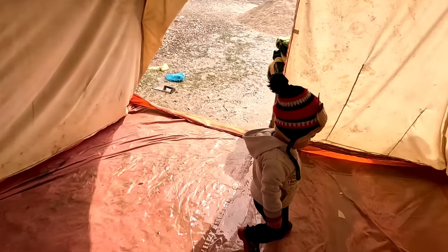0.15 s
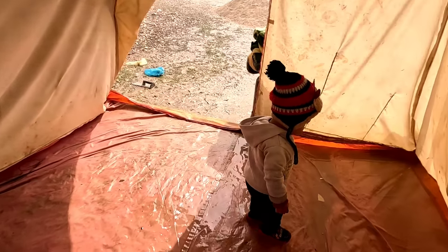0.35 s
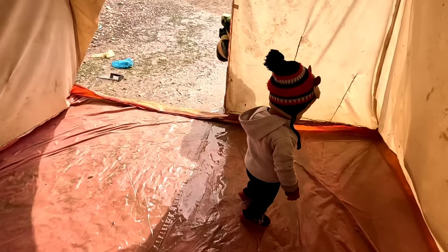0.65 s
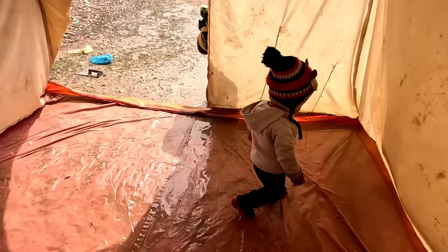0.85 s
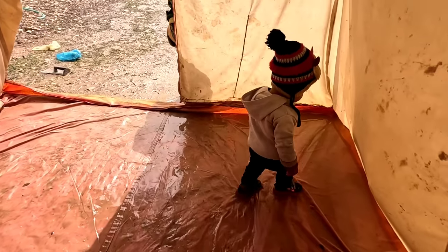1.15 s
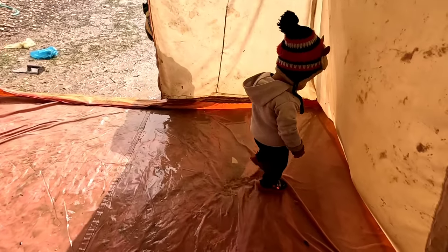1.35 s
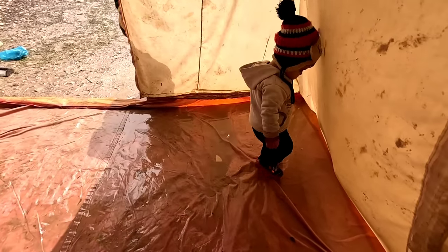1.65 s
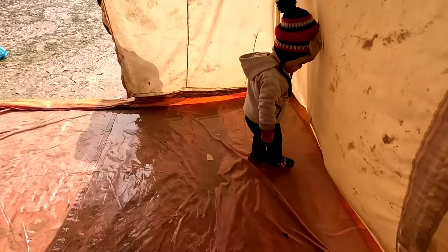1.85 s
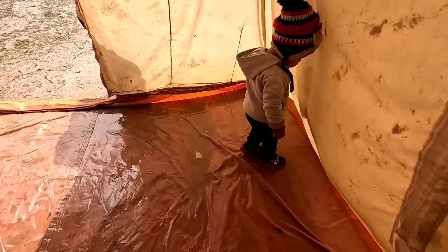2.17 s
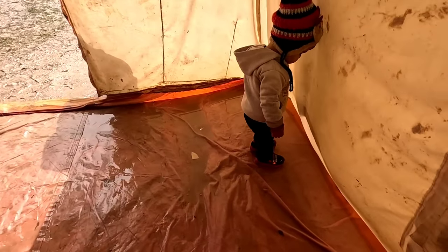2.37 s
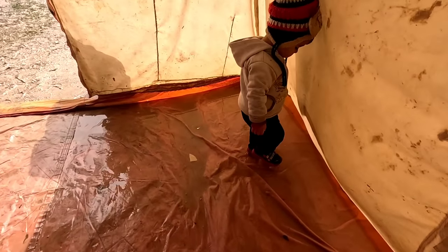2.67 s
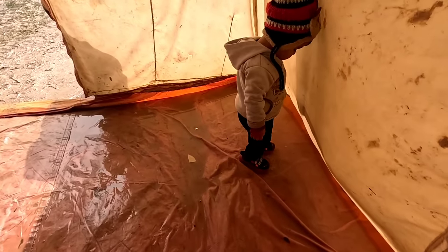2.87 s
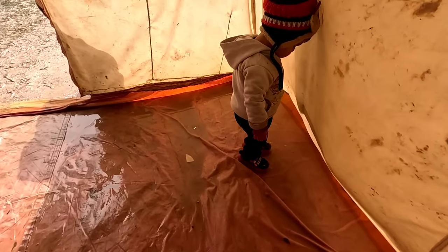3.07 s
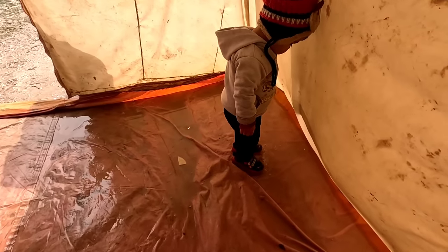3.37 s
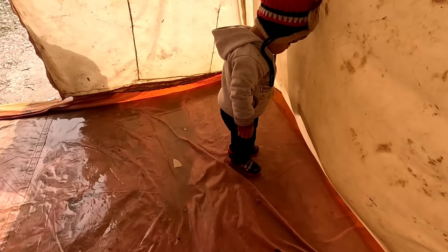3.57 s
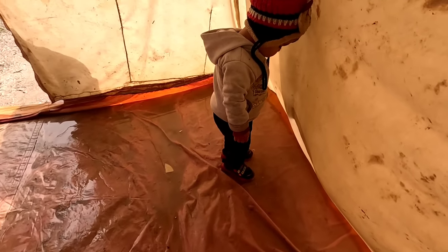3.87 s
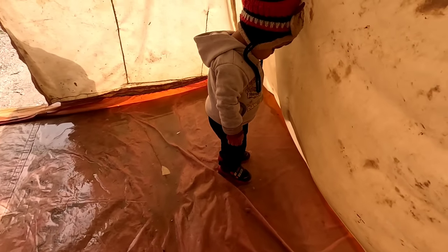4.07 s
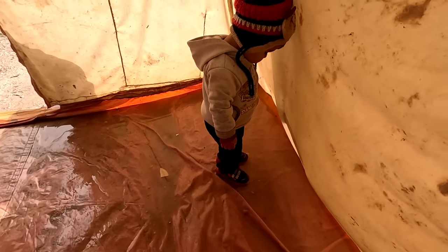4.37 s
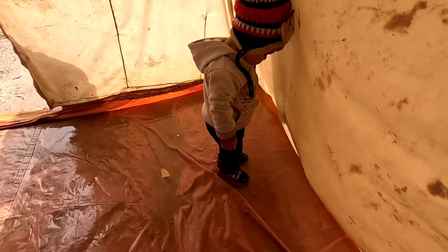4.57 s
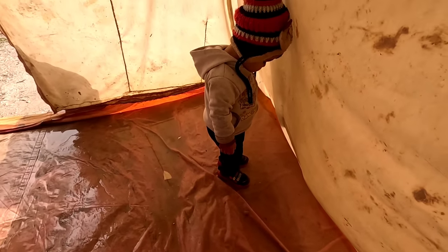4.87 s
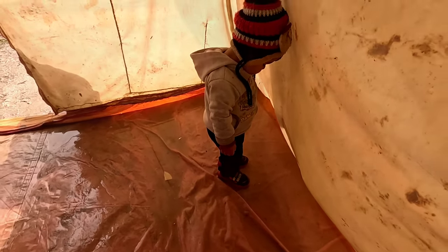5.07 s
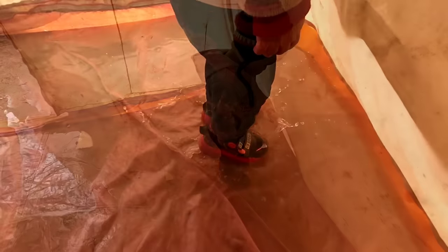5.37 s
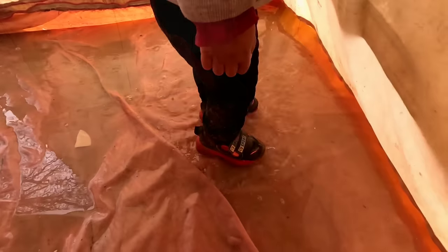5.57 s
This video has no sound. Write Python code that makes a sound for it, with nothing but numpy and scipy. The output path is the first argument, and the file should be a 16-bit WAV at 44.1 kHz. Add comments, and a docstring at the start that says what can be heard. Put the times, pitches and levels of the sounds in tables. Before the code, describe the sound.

Small wet footsteps patter through a puddle inside a canvas tent, pause over a faint trickle, and resume closer after thumps on the microphone.

```python
"""Boots slap shallow water first: a toddler paddles on the plastic groundsheet of a flooded tent.
Each slap is a cloud of damped bubble tones and noise; larger air pockets plop as gliding damped sines.
Between the steps a wash of bubble noise trickles back; dull bumps ring a small casing and rub noise on it.
Far off an engine hums as a sinking sine, a bird chirps in swept sines, and filtered noise gives murk and
puffs of air. The canvas adds a diffuse tail; near the end the sound turns louder, wide and left-bright."""
import sys
import numpy as np
from scipy import signal
from scipy.fft import rfft, irfft, next_fast_len
from scipy.io import wavfile
from scipy.ndimage import uniform_filter1d, map_coordinates

SR = 44100
rng = np.random.default_rng(int(sys.argv[2]) if len(sys.argv) > 2 else 0)


def int16_out(signal):
    """Quantize to a 16-bit WAV file."""
    q = np.round(np.clip(np.atleast_2d(signal).T, -1, 1) * 32767)
    wavfile.write(sys.argv[1], SR, q.astype(np.int16))


N = 252252
T = np.arange(N) / SR  # time [s]

# Boots slapping the water:
# (time [s], rise [s], t60 [s], level [dB], commonest bubble pitch [Hz], pitch spread [octaves])
SPLASHES = [(.075, 0.012, .22, -38.5, 1670, 0.74), (.165, 0.027, 0.23, -47, 2160, 0.45),
            (.272, 0.031, 0.13, -41.5, 2290, 0.37), (.357, 0.0038, 0.11, -38, 2480, 0.26),
            (.367, .014, .13, -29.5, 3020, 0.3), (.448, 0.011, 0.2, -30.5, 2660, 0.4),
            (.895, 0.02, 0.27, -44.5, 2180, 1.2), (.914, 0.0093, .15, -33.5, 2540, 1.3),
            (1.176, 0.0023, .1, -39.5, 3380, 0.55), (1.179, 0.011, 0.17, -35.5, 3000, 0.63),
            (1.533, 0.0086, 0.21, -40.5, 1810, 0.82), (1.549, 0.01, 0.1, -34, 1160, 0.89),
            (1.579, 0.0061, 0.12, -29.5, 3400, 0.69), (1.659, 0.045, .15, -40, 2080, 0.95),
            (1.956, 0.0087, 0.6, -49, 2640, 1.04), (1.989, 0.0013, .2, -36, 3320, 0.12),
            (2.007, 0.0051, 0.093, -33, 4900, 0.83), (2.496, 0.024, 0.14, -37.5, 3800, 1.8),
            (2.541, 0.0047, 0.14, -35, 1200, 0.65), (2.623, 0.0039, 0.09, -42.5, 1980, 0.35),
            (2.761, 0.037, 0.068, -46.5, 1340, 0.5), (2.886, 0.014, 0.089, -48.5, 3000, 0.47),
            (2.905, 0.011, 0.15, -31, 2520, 0.72), (2.986, 0.0039, 0.17, -45.5, 2830, 0.41),
            (3.287, 0.0056, 0.11, -33.5, 3800, 0.43), (3.304, 0.018, .135, -31, 2050, 0.83),
            (5.309, .0012, 0.073, -36.5, 1860, 0.53), (5.319, 0.012, 0.2, -38, 1820, 0.57),
            (5.416, 0.0015, 0.12, -40.5, 1670, 0.48), (5.463, 0.0016, 0.068, -37.5, 2020, 0.47),
            (5.477, 0.011, 0.24, -43.5, 2330, 0.41)]
# Fine spray: commonest pitch [Hz], spread [octaves]
SPRAY_HZ, SPRAY_SPREAD = 6960, 0.43
# Spray relative to a hard slap [dB], level of such a slap [dB], extra share of harder slaps [dB per dB]
SPRAY_DB, HARD_SLAP_DB, SPRAY_GROWS = -13.5, -30, 1.3


def splashes(crack=2.6, clump_db=1.2):
    """Minnaert resonance: entrained bubbles ring, small ones crackling and large ones longer, amid fine spray."""
    out = np.zeros(N)
    t = np.arange(SR // 3) / SR
    for s, rise, t60, db, pitch, spread in SPLASHES:
        # only a sudden slap opens with a crack
        envelope = swell(t, rise, t60, curve=0.61) + crack * np.exp(-(t + rise) / 0.0015)
        crackle = bubbles(len(t), per_second=4000, cycles=1.3, spread_db=3.5, size=192)
        ringing = bubbles(len(t), per_second=1500, cycles=25, spread_db=1, size=640)
        hiss = rng.standard_normal(len(t))
        clumps = amp(clump_db * wobble(197, size=len(t)))
        cloud = envelope * clumps * (crackle + 0.79 * ringing + 0.58 * hiss)
        spray = amp(SPRAY_DB + SPRAY_GROWS * (db - HARD_SLAP_DB))

        def colour(hz):
            """Incoherent sources add in power: bubble cloud plus spray."""
            return np.hypot(bubble_colour(hz, pitch, spread),
                            spray * bubble_colour(hz, SPRAY_HZ, SPRAY_SPREAD))

        cloud = filtered(cloud, colour)
        # the cloud takes the energy of its envelope
        add(out, s, amp(db) * cloud * np.linalg.norm(envelope) / np.linalg.norm(cloud))
    return out


# Colour common to all splashes: (frequency [Hz], gain [dB])
WATER = [(60, -9), (300, 5), (600, 1.5), (3000, -0.5), (10300, -1), (12000, -14), (15000, -16)]
SKIRT_DB_PER_OCTAVE = 6  # for a spread of one octave, far from the commonest pitch


def bubble_colour(hz, pitch, spread):
    """Size distribution: bubbles thin out to either side of the commonest pitch; the gain has rms 1."""
    octaves = np.log2((hz + 1) / pitch)
    skirt = SKIRT_DB_PER_OCTAVE * np.hypot(1, octaves / spread)
    return unit(amp(along(WATER, hz) - skirt))


# Larger air pockets closing, and single drops landing: (time [s], pitch [Hz], relative level [dB])
PLOPS = [(.081, 1090, -28), (0.086, 1526, -34), (.172, 2120, -43), (.923, 706, -34), (0.941, 3090, -33.5),
         (2.006, 2610, -25.5), (2.545, 420, -42), (2.545, 1085, -29.5), (2.549, 1385, -31.5),
         (2.607, 780, -38.5), (2.61, 1940, -43), (2.626, 2094, -32.5), (2.848, 2540, -45),
         (2.99, 2710, -41), (3.002, 4170, -40), (3.314, 2412, -25), (3.322, 1680, -28.5),
         (3.436, 2130, -45.5), (3.87, 8500, -60.5), (4.145, 9100, -66), (4.197, 4300, -57.5),
         (4.312, 11500, -71), (4.448, 10130, -62.5), (4.688, 6300, -56.5), (5.339, 1950, -45),
         (5.417, 1776, -35.5), (5.463, 1563, -34), (5.495, 2030, -41), (5.502, 1610, -39.5),
         (5.533, 822, -44.5), (5.539, 1160, -48.5)]


def plops(t60=0.055, glide=0.19, attack=0.0012, rough=0.078):
    """Bubble resonance: a trapped pocket rings briefly, jostled by shallow water and rising as it surfaces."""
    out = np.zeros(N)
    t = np.arange(SR // 12) / SR
    for s, hz, db in PLOPS:
        jostle = unit(uniform_filter1d(rng.standard_normal(len(t)), size=40))
        pitch = hz * (1 + glide * (t - t60 / 4) + rough * jostle)  # glide is a fraction per second
        ring = np.sin(2 * np.pi * np.cumsum(pitch) / SR)
        onset = 1 - np.exp(-t / attack)
        add(out, s, amp(db + 2.5 - 60 * t / t60) * onset * ring)
    return out


# Spectrum of the low wash: (frequency [Hz], relative density [dB per Hz])
GURGLE = [(200, -2), (500, -14), (900, -7), (1500, -0.5), (2100, -7), (3500, -45), (8000, -70)]
# Spectrum of the bright wash: (frequency [Hz], relative density [dB per Hz])
FIZZ = [(900, -39), (2000, -2), (3200, 2.5), (5000, -7), (10000, -19), (11800, -27.5), (15000, -39)]
# Spectrum of the drips: (frequency [Hz], relative density [dB per Hz])
DRIPS = [(500, -20), (1500, -7), (3500, -11), (6000, -9), (10000, -18), (15000, -45)]
# Wavelets running back over the sheet after the steps:
# (time of crest [s], half-length [s], relative gurgle level [dB], relative fizz level [dB])
BACKWASH = [(0.042, 0.043, -62, -53.5), (0.644, 0.058, -74, -54), (0.742, 0.075, -57.5, -55.5),
            (1.082, 0.055, -85, -59.5), (1.31, 0.1, -58, -54.5), (1.853, 0.084, -58.5, -55.5),
            (2.276, 0.041, -58, -57.5), (2.46, 0.15, -64, -58), (2.71, 0.11, -54, -53),
            (3.12, 0.079, -54.5, -50.5), (3.443, 0.038, -59.5, -54), (3.946, 0.15, -64.5, -69),
            (4.64, 0.1, -66.5, -61), (4.843, 0.1, -80, -66), (5.676, 0.014, -56.5, -65)]
CALM_DB = -72.5  # relative level of the wash when nothing stirs it
# Wash stirred up: level relative to its splash [dB], rise [s], t60 [s]
STIR_DB, STIR_RISE_S, STIR_T60_S = -27.5, 0.015, 1.67


def trickle(gurgle_db=-3, fizz_db=-3.5, drips_db=-13):
    """Power summation: stirred wash settles slowly and swells again as wavelets run back into the folds."""
    stirred = amp(CALM_DB) ** 2
    for s, _, _, db, _, _ in SPLASHES:
        stirred = stirred + (amp(db + STIR_DB) * swell(T - s, STIR_RISE_S, STIR_T60_S)) ** 2
    wavelets = 0
    for s, half, *levels in BACKWASH:
        wavelets = wavelets + np.outer(amp(levels) ** 2, np.exp(-((T - s) / half) ** 2))
    deep, shallow = np.sqrt(stirred + wavelets)  # envelopes of gurgle and of fizz
    gurgle = amp(gurgle_db + 4.0 * wobble(40)) * coloured(froth(), GURGLE)
    fizz = amp(fizz_db + 2.8 * wobble(40)) * coloured(froth(), FIZZ)
    drops = bubbles(N, per_second=160, cycles=17, spread_db=6.5, size=900)
    drips = amp(drips_db) * coloured(drops, DRIPS)
    return deep * (gurgle + drips) + shallow * fizz


def froth():
    """Random superposition: dense short bubble tones over white noise."""
    return bubbles(N, per_second=5000, cycles=4, spread_db=3, size=160) + 1.3 * rng.standard_normal(N)


def bubbles(n, per_second, cycles, spread_db, size=384):
    """Shot noise of damped oscillators: tiny bubbles of random time, pitch, life and strength, at rms 1."""
    u = rng.random((max(int(per_second * n / SR), 1), 4))
    hz = 350 + 15000 * u[:, 1:2] ** 2
    life = cycles * (.5 + u[:, 2:3]) / hz  # decay time constant [s]
    strength = amp(-spread_db * np.log(np.maximum(u[:, 3:], .02)))
    gain = strength * hz ** .25 / np.sqrt(life)  # evens out the spectrum
    t = np.arange(size) / SR
    rings = gain * np.exp(-t / life) * np.sin(2 * np.pi * hz * t)
    where = (u[:, :1] * n).astype(int) + np.arange(size)
    return unit(np.bincount(where.ravel(), rings.ravel(), n)[:n])


# Knocks on a hand-held casing: (time [s], relative knock level [dB], relative rub level [dB], t60 of rub [s])
BUMPS = [(.6, -36, -65, 0.48), (3.164, -43.5, -70, 0.42), (3.272, -48.5, -72, .42), (3.757, -38, -84, 0.42),
         (3.796, -35.5, -54.5, 0.99), (3.905, -39.5, -64, 0.81), (4.945, -22, -30, 0.59),
         (4.988, -21.5, -28, 0.26), (5.028, -31, -32.5, 0.23), (5.058, -29.5, -59, 0.33),
         (5.089, -33.5, -29, 0.065)]
# Resonant modes of the casing: (frequency [Hz], relative level [dB], t60 [s])
CASING = [(71, -3.5, 0.15), (116, -8.5, 0.22), (173.5, -1, 0.23), (210.5, -1.5, 0.24), (304.6, -16, 0.37),
          (433.6, -28, 0.08), (491, -20.5, 0.15), (854, -31.5, 0.27)]
# Spectrum of the hand's rub: (frequency [Hz], relative density [dB per Hz])
RUB = [(40, 1), (170, 8), (330, -7.5), (480, -0.5), (570, -8.5), (680, -19), (880, -19), (1300, -19),
       (2500, -29.5), (4000, -34), (8000, -42.5), (14000, -66)]


def bumps(attack=0.0045, rub_attack=0.0017):
    """Modal excitation: a soft knock rings the casing's modes; the hand catches on it and friction rubs."""
    out = np.zeros(N)
    t = np.arange(SR // 2) / SR
    for s, knock_db, rub_db, rub_t60 in BUMPS:
        ring = sum(amp(db - 60 * t / t60) * np.sin(2 * np.pi * hz * t) for hz, db, t60 in CASING)
        ring *= 1 - np.exp(-(t / attack) ** 2)
        rub = coloured(rng.standard_normal(len(t)), RUB)
        rub *= amp(-60 * t / rub_t60) * (1 - np.exp(-t / rub_attack))
        add(out, s, amp(knock_db) * ring + amp(rub_db) * rub)
    return out


# Chirps, one sweep each: (time [s], length [s], start pitch [Hz], end pitch [Hz], relative level [dB])
CHIRPS = [(3.416, 0.1, 4460, 2460, -54), (4.01, 0.015, 3420, 5800, -59.5), (4.029, 0.036, 5470, 3170, -51),
          (4.07, 0.064, 3130, 3260, -62), (4.1, 0.019, 3240, 4500, -54.5), (4.748, .02, 3690, 4450, -53.5),
          (4.767, .07, 3940, 2790, -56), (4.837, .02, 3440, 4170, -57), (4.865, .035, 3060, 1730, -58)]


def bird(flutter=0.019):
    """Frequency modulation: thin whistles sweep quickly up or down with a slight flutter."""
    out = np.zeros(N)
    waver = 1 + flutter * wobble(400)
    flicker = amp(3.2 * wobble(150))
    for s, length, start_hz, end_hz, db in CHIRPS:
        u = np.clip((T - s) / length, 0, 1)  # progress through the chirp
        pitch = start_hz * (end_hz / start_hz) ** u * waver
        arch = 2 * np.sqrt(u * (1 - u))
        out += amp(db - 0.5) * arch * np.sin(2 * np.pi * np.cumsum(pitch) / SR)
    return flicker * out


# Level of the far engine's hum: (time [s], relative level [dB])
ENGINE = [(0, -56.5), (1.4, -52), (2.4, -55.5), (3.05, -75.5), (3.8, -53), (5.3, -66)]
ENGINE_HZ, ENGINE_SAG_HZ_PER_S = 256.2, 4.3  # mean pitch at the start, and its steady fall


def engine():
    """Tonal radiation: a single wavering sine sinks in pitch as the far engine slows."""
    hz = (ENGINE_HZ - ENGINE_SAG_HZ_PER_S * T) * (1 + 0.0217 * wobble(30))
    tone = unit(np.sin(2 * np.pi * np.cumsum(hz) / SR))
    times, levels = np.transpose(ENGINE)
    return amp(np.interp(T, times, levels) - 3.2 + 2.2 * wobble(11)) * tone


# Puffs of air on the microphone: (time [s], rise [s], t60 [s], level [dB])
PUFFS = [(.5, 0.051, 0.96, -41.5), (2.48, .06, 1.2, -54), (3.17, 0.12, 0.68, -41),
         (3.75, 0.029, 0.39, -43.5), (4.4, .3, 1.8, -52), (4.93, 0.031, 0.37, -39)]
# Spectrum of their rumble: (frequency [Hz], relative density [dB per Hz])
RUMBLE_COLOUR = [(12, -4), (35, 1.5), (70, -9), (130, -15.5), (250, -15.5), (600, -65)]
STILL_AIR_DB = -64.5  # rumble between the puffs


def air_puffs():
    """Turbulence: moving air gives low noise at the microphone, the puffs adding in power."""
    power = amp(STILL_AIR_DB) ** 2
    for s, rise, t60, db in PUFFS:
        power = power + (amp(db) * swell(T - s, rise, t60)) ** 2
    return np.sqrt(power) * coloured(rng.standard_normal(N), RUMBLE_COLOUR)


# Spectrum of the outdoor murk: (frequency [Hz], relative density [dB per Hz])
OUTDOORS = [(20, 3.5), (80, -16.5), (130, -5.5), (175, 5.5), (215, -6), (275, -1), (340, -10.5),
            (500, -18.5), (800, -25.5), (3000, -32), (10000, -39), (15000, -65)]
CLOSE_S = 5.29  # from here on the listening point is down by the boots


def outdoor_murk():
    """Stationary noise, spectrally shaped: the outdoors drifts in level and is fainter close to the boots."""
    level_db = np.where(T < CLOSE_S, -56.5, -64) + 3.1 * wobble(5.58)
    return amp(level_db) * coloured(rng.standard_normal(N), OUTDOORS)


# Reverberation between the canvas walls: (frequency [Hz], t60 [s])
TENT = [(200, 0.23), (1500, 0.1), (4000, 0.18), (12000, 0.15)]


def reflected(x, decays, delay):
    """Diffuse reverberation: after delay seconds, a noise tail decays at its own rate in each band."""
    hz, t, z = signal.stft(rng.standard_normal(SR // 3), SR, nperseg=256)
    decay = amp(-60 * t / along(decays, hz)[:, None])
    tail = signal.istft(z * decay, SR, nperseg=256)[1]
    tail = np.concatenate([np.zeros(int(delay * SR)), tail])
    return signal.fftconvolve(x, tail / np.linalg.norm(tail))[:N]


def amp(db):
    """Logarithmic level: decibels to amplitude gain."""
    return 10 ** (np.asarray(db) / 20)


def unit(x):
    """Normalisation: x at rms 1."""
    return x / np.sqrt(np.mean(x ** 2) + 1e-20)


def along(points, hz):
    """Logarithmic frequency scale: (frequency [Hz], value) points interpolated at hz."""
    f, v = np.transpose(points)
    return np.interp(np.log(hz + 1), np.log(f + 1), v)


def wobble(rate, size=N):
    """Band-limited fluctuation: a smooth random curve with rate knots a second."""
    knots = rng.standard_normal(int(size * rate / SR) + 4)
    return map_coordinates(knots, [T[:size] * rate])


def swell(t, rise, t60, curve=1):
    """Exponential decay: an envelope climbs to 1 in rise seconds from t = 0, then dies away."""
    return np.clip(t / max(rise, 1e-3), 0, 1) ** curve * amp(-60 * np.maximum(t - rise, 0) / t60)


def add(track, s, sound):
    """Linear superposition: mix a sound into the track at time s [s]."""
    part = track[max(round(s * SR), 0):][:len(sound)]
    part += sound[:len(part)]


def filtered(x, response):
    """Linear filtering: the spectrum of x times a response of frequency."""
    n = x.shape[-1]
    m = next_fast_len(n + SR // 4)
    return irfft(rfft(x, m) * response(np.fft.rfftfreq(m, 1 / SR)), m)[..., :n]


def coloured(x, points):
    """Spectral shaping: x through a (frequency [Hz], gain [dB]) curve, at rms 1."""
    return unit(filtered(x, lambda hz: amp(along(points, hz))))


# Close to the boots, the left side faces the spray: (frequency [Hz], gain [dB])
FACING = [(300, -3.5), (1000, 0), (3500, 1), (9000, 11), (10500, 6), (12300, 16.5), (15000, 11)]
# The right side is shadowed: (frequency [Hz], gain [dB])
SHADOWED = [(300, -1), (1000, 2), (3000, -4.5), (6000, -12), (9000, -17), (14000, -9)]
# Phase between the two sides close to the water: (frequency [Hz], phase [radians])
OUT_OF_STEP = [(100, 1.2), (500, 1.46), (1500, 1.52), (10000, 1.4)]


def scene():
    """Superposition, then interaural contrast: a central sum turns wide and left-bright close to the boots."""
    water = splashes() + plops() + trickle()
    chirps = bird()
    canvas = reflected(amp(-9.0) * water + amp(-4.5) * chirps, TENT, delay=.004)
    background = engine() + air_puffs() + outdoor_murk()
    mid = water + amp(-2.5) * chirps + canvas + bumps() + background
    closeness = np.clip((T - CLOSE_S) / .015, 0, 1)
    near = amp(2.5) * mid * closeness

    def half_turn(hz):
        """Phase difference: half of it for each side."""
        return np.exp(.5j * along(OUT_OF_STEP, hz))

    left = filtered(near, lambda hz: amp(along(FACING, hz)) / half_turn(hz))
    right = filtered(near, lambda hz: amp(along(SHADOWED, hz)) * half_turn(hz))
    return mid * (1 - closeness) + np.array([left, right])


def record(dry):
    """Band limitation: a very steep low-pass at 15.4 kHz."""
    top_hz = 15400
    return filtered(dry, lambda hz: 1 / (1 + (hz / top_hz) ** 120))


dry = scene()
out = record(dry)
int16_out(out)
```